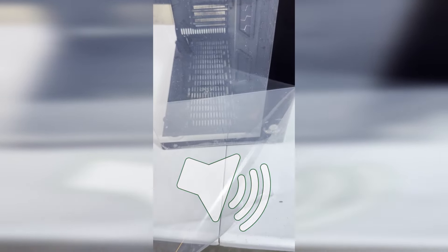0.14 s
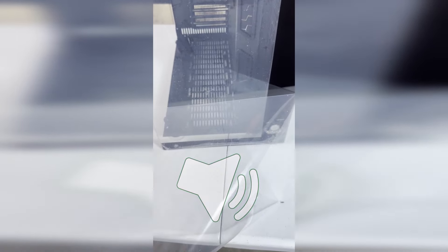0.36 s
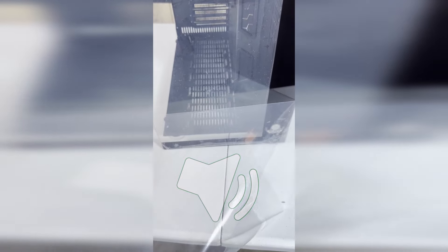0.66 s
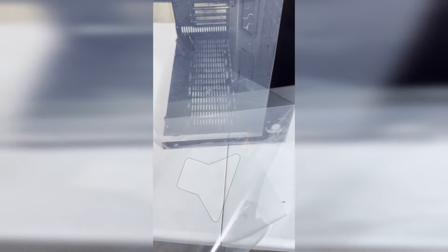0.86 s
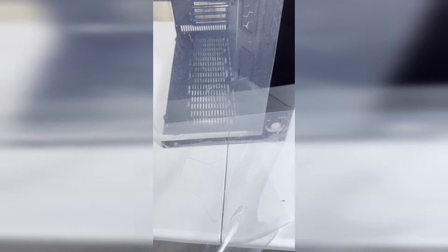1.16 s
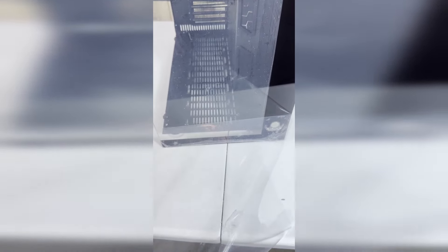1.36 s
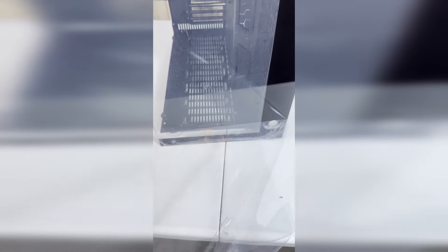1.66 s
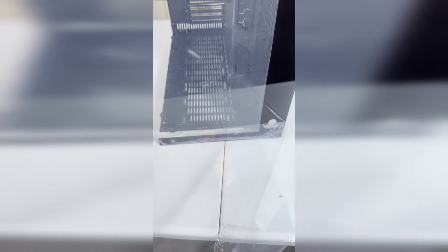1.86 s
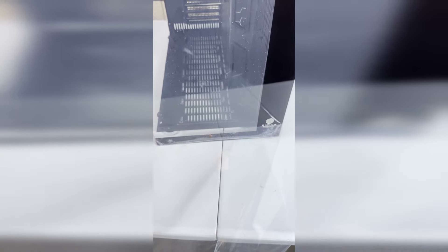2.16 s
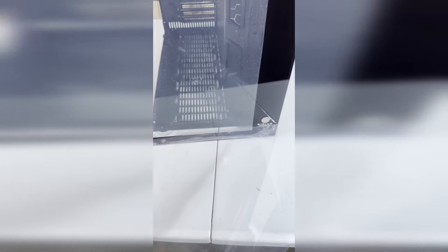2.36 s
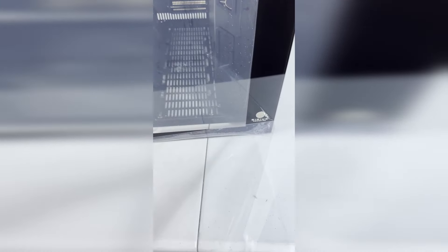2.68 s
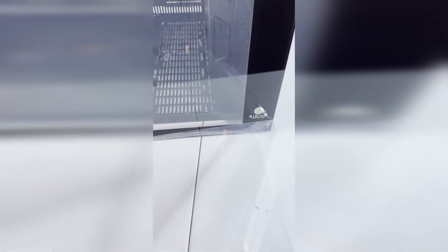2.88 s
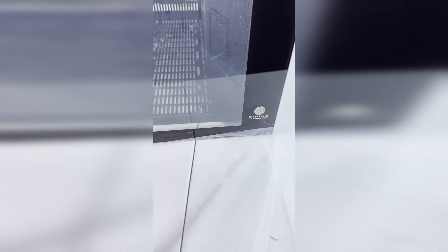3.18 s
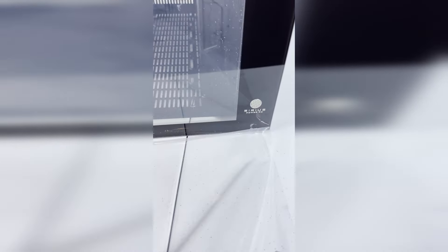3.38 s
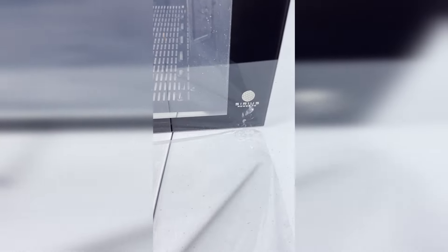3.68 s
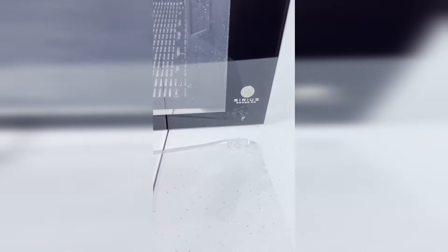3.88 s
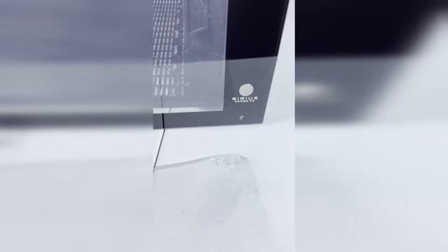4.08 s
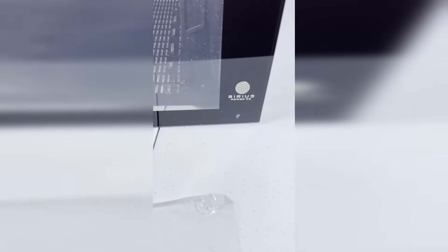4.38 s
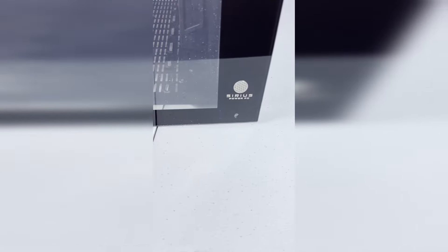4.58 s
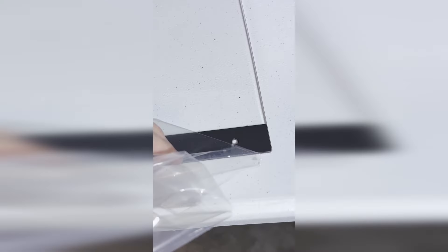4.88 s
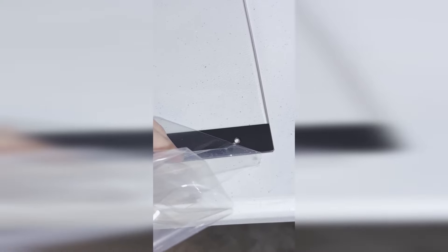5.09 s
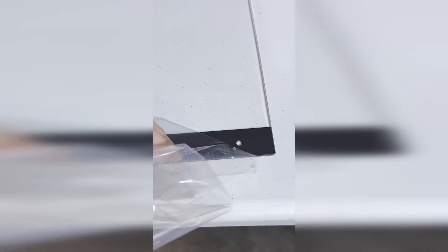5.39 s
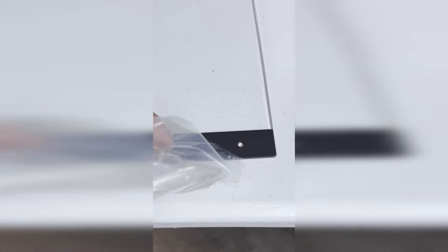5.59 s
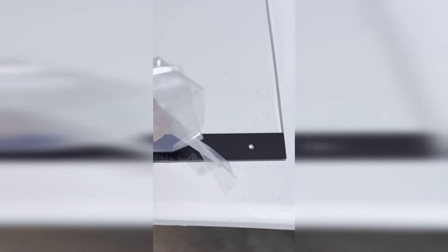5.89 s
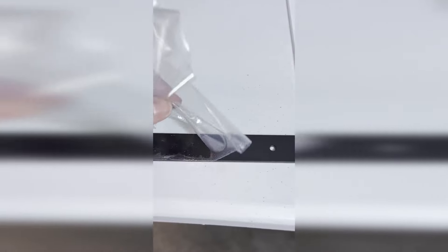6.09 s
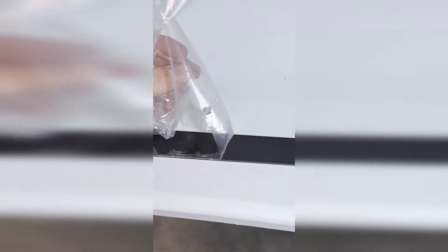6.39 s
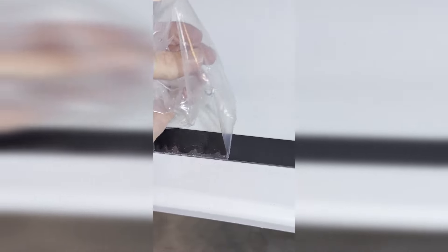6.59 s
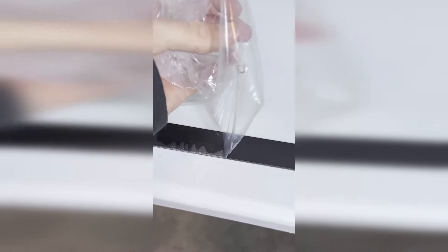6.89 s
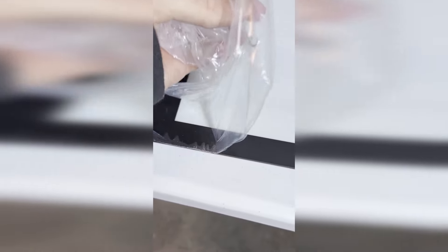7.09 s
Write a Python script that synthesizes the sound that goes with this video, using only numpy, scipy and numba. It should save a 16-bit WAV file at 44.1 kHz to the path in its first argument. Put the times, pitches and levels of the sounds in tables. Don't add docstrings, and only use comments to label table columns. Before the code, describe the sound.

Protective plastic film peels off a clear panel close up, hissing smoothly, then crackling sharply in jerks, ending in loud crinkling over low traffic rumble.

```python
import sys
import numpy as np
from scipy import signal
from scipy.fft import rfft, irfft, next_fast_len
from scipy.io import wavfile
from scipy.ndimage import uniform_filter1d, map_coordinates
from numba import njit

SR = 44100
rng = np.random.default_rng(int(sys.argv[2]) if len(sys.argv) > 2 else 0)


def wav_record(signal):
    frames = np.transpose(np.atleast_2d(signal))
    bounded = np.clip(frames, -1, 1)
    quanta = np.round(bounded * 32767).astype(np.int16)
    wavfile.write(sys.argv[1], SR, quanta)


def how_loud(loudness_db):
    steps = np.asarray(loudness_db, float) / 20
    return 10 ** steps


N = 319725
TIME = np.arange(N) / SR
SIZE = next_fast_len(N, True)
FREQ = np.fft.rfftfreq(SIZE, 1 / SR)


def weigh(x, gain):
    return irfft(rfft(x, SIZE) * gain, SIZE)[..., :N]


def colour(x, table):
    hz, db = np.transpose(table)
    return weigh(x, how_loud(np.interp(np.log(FREQ + 1), np.log(hz), db)))


def unit(x):
    return x / np.sqrt(np.mean(x ** 2))


def walk(rate_hz):
    hold = int(SR / rate_hz)
    steps = np.repeat(rng.standard_normal(N // hold + 1), hold)
    return 1.04 * uniform_filter1d(steps, hold)[:N]


# start t/s, end t/s
TAKES = [
    (0, 1.264),
    (1.266, 4.729),
    (4.728, 7.25),
]


def during(t0, t1):
    return np.clip(np.minimum(TIME - t0, t1 - TIME) / .003 + .5, 0, 1)


@njit
def resonate(x, hz, damping):
    y, band, low = np.empty(len(x)), 0., 0.
    for i in range(len(x)):
        g = np.tan(np.pi * hz[i] / SR)
        v = (band + g * (x[i] - low)) / (1 + g * (g + damping))
        band = 2 * v - band
        low = low + 2 * g * v
        y[i] = damping * v
    return y


GRIP_DB_S, LET_GO_DB_S = 1505.5, 1103


def effort(pulls):
    levels_db = []
    for t0, t1, db0, db1 in pulls:
        drift = np.interp(TIME, [t0, t1], [db0, db1])
        onset = GRIP_DB_S * np.clip(t0 - TIME, 0, None)
        release = LET_GO_DB_S * np.clip(TIME - t1, 0, None)
        levels_db.append(drift - onset - release)
    return np.max(levels_db, axis=0)


TEAR_S = 0.011


def tearing(start_s):
    s, db, ring_db, _ = np.concatenate(SNAP_FLURRIES).T
    kicks = np.zeros((2, N))
    kicks[:, (s * SR).astype(int)] = how_loud(np.array([db, db + ring_db])) ** 2 * (s > start_s)
    return signal.lfilter([1], [1, -np.exp(-1 / (TEAR_S * SR))], kicks)


def slipping(rate_hz, spread_db, cluster_db, hiss_db, tint):
    chance = rng.random((2, N))
    slips = (chance[0] < rate_hz / SR) * how_loud(-spread_db * np.log(chance[1] + .02))
    smear = rng.standard_normal(132) * np.exp(-np.arange(132) / SR / 0.00014)
    grain = unit(signal.fftconvolve(slips, smear)[:N]) + how_loud(hiss_db) * rng.standard_normal(N)
    grain = grain * how_loud(cluster_db * (walk(140) + .6 * walk(45)))
    return colour(grain, tint[:-1])


def split(x):
    top = 1 / (1 + (5250 / (FREQ + 1)) ** 9)
    low = 1 / (1 + (FREQ / 1450) ** 6)
    return [unit(band) for band in weigh(x, np.array([top, 1 - top - low, low]))]


FAR_LAG_MS, FAR_SWAY_MS, FAR_SHARE = 0.804, 0.035, 0.3
# t/s, lag/ms, share 0-1
NEAR_GLASS = [(3.7, .14, 0), (3.88, .15, .4), (4.05, .23, .4), (4.15, .275, .4), (4.35, .3, .3),
              (4.6, .26, .4), (4.73, .25, .5)]


def mirrored(x):
    s, near_lag_ms, near_share = np.transpose(NEAR_GLASS)
    far = TIME < TAKES[0][1]
    far_lag_ms = FAR_LAG_MS + FAR_SWAY_MS * walk(3.2)
    lag_ms = np.where(far, far_lag_ms, np.interp(TIME, s, near_lag_ms))
    late = map_coordinates(x, [np.arange(N) - SR / 1000 * lag_ms], order=2)
    dull = weigh(late, 1 / (1 + (FREQ / 4300) ** 8))
    bright = np.interp(TIME, s, near_share, right=0) * (late - dull)
    return x + np.where(far, -FAR_SHARE * dull, bright)


# start t/s, end t/s, from f/Hz, to f/Hz, boost level/dB
AIR_POCKET = [(0.088, 0.615, 1650, 1880, -3), (0.244, 0.564, 3300, 3500, 0.5),
              (1.015, 1.039, 850, 1000, 11), (1.022, 1.048, 2580, 1890, 1), (1.073, 1.244, 3000, 3200, -14),
              (7.088, 7.123, 6300, 5500, 2.5), (6.7, 6.77, 2810, 2020, 11.5),
              (6.81, 6.915, 1760, 1380, 8.5), (6.836, 7.068, 950, 480, 3.5),
              (7.07, 7.192, 1720, 1530, -0.5), (7.11, 7.25, 230, 204, 14.5)]


def pocketed(x):
    out = x
    for t0, t1, hz0, hz1, db in AIR_POCKET:
        boost = how_loud(db) * np.clip(np.minimum(TIME - t0, t1 - TIME) / 0.02 + 1, 0, 1)
        glide_hz = np.exp(np.interp(TIME, [t0, t1], np.log([hz0, hz1])))
        out = out + boost * resonate(x, glide_hz, 0.19)
    return out


# start t/s, end t/s, start level/dB, end level/dB
EASY_PULLS = [(0, .27, -48.5, -42), (.27, .6, -43, -41), (.6, .8, -43.5, -44.5), (.8, 1.01, -43.5, -39),
              (1.017, 1.054, -37.5, -35), (1.05, 1.27, -37, -39.5)]
JERKY_PULLS = [(1.264, 1.99, -54, -51.5), (1.98, 2.297, -51, -63), (2.305, 2.622, -58, -69.5),
               (2.647, 3.13, -62, -46.5), (2.176, 2.211, -49, -42.5), (3.163, 3.443, -49, -66.5),
               (3.444, 3.743, -62, -42), (3.559, 3.623, -48.5, -40), (3.756, 4.45, -42.5, -46),
               (4.433, 4.631, -48, -41), (4.632, 4.688, -43, -47.5), (4.692, 4.746, -45.5, -33.5)]
EDGE_PULLS = [(4.729, 5.453, -95, -75.5), (5.465, 5.52, -59, -55), (5.519, 5.699, -48, -54.5),
              (5.721, 5.796, -46, -50), (5.806, 6.065, -52, -42), (6.079, 6.143, -37.5, -37.5),
              (6.158, 6.23, -44.5, -46), (6.231, 6.282, -37, -31.5), (6.283, 6.377, -31, -40.5),
              (6.39, 6.664, -51.5, -48.5), (6.695, 6.765, -34.5, -33.5), (6.812, 6.955, -31.5, -30.5),
              (6.962, 7.08, -31, -31.5), (7.064, 7.254, -30, -30)]
# t/s, taut level/dB, slack level/dB
FILM_STATE = [(0, -2.5, -0.5), (.6, -8.5, -4.5), (1.26, -8.5, -8.5), (2, -7, -5), (2.35, -2, -11.5),
              (2.6, -5.5, -11), (2.9, -1, -14), (3.5, 1, -6), (3.75, 0.5, -14.5), (3.9, 7, -10.5),
              (4.05, 4.5, -9), (4.42, 12, -6), (4.722, 17, -5), (4.8, -5.5, 6), (5.5, 6, -4.5),
              (6.2, 6, 0.5), (6.7, 8, 3), (7.25, 5, -6)]
TEAR_DB = [-28, -31, -30]
# f/Hz, density level/dB per Hz
PEEL_COLOUR = [
    [(180, -44), (300, -25), (501, -13.5), (723, -4), (1030, -6.5), (1280, 4.5), (1670, -5), (1880, -1),
     (2480, 0.5), (3140, -3), (4870, -11), (7680, -4), (10000, -5.5), (13000, -14.5), (22000, -120)],
    [(180, -21.5), (300, -12.5), (402, -10.5), (439, -11.5), (734, -14), (3580, -12.5), (4870, -23),
     (5320, -16.5), (6530, -13), (8300, -15), (10000, -14.5), (13000, -30), (22000, -120)],
    [(180, -14.5), (300, -8), (767, -3.5), (1990, -2.5), (2960, 1.5), (4870, -4.5), (5900, -7.5),
     (7570, -13), (8890, -6), (10000, -9), (13000, -10), (22000, -120)],
]
# rate/Hz, size spread/dB, clustering/dB, smooth hiss level/dB
SLIPS = [
    (3000, 3, 1, -2),
    (1800, 3.2, 1.3, -4),
    (2200, 3.2, 1.6, -4),
]


def peel():
    out = 0
    s, taut_db, slack_db = np.transpose(FILM_STATE)
    taut = how_loud(np.interp(TIME, s, taut_db))
    slack = how_loud(np.interp(TIME, s, slack_db))
    hands = (EASY_PULLS, JERKY_PULLS, EDGE_PULLS)
    for take, pulls, tear_db, tint, slips in zip(TAKES, hands, TEAR_DB, PEEL_COLOUR, SLIPS):
        sizzle, sheet, flap = split(slipping(*slips, tint))
        pull = how_loud(effort(pulls))
        crack, ring = tearing(take[0])
        bright = np.sqrt((pull * taut) ** 2 + how_loud(tear_db) ** 2 * crack)
        body = np.sqrt(pull ** 2 + how_loud(tear_db + 7.5) ** 2 * ring)
        layers = bright * sizzle + body * sheet + slack * np.sqrt(pull * body) * flap
        out = out + during(*take) * layers
    return pocketed(mirrored(out))


# t/s, level/dB
RUMBLE_LEVEL = [
    [(0.0, -41.5), (1.238, -36.5), (1.27, -35)],
    [(1.27, -84), (1.29, -57), (1.65, -51.5), (1.9, -49), (2.1, -58), (2.45, -62.5), (4.73, -48.5)],
    [(4.74, -56.5), (6.59, -55.5), (7.25, -37)],
]
# f/Hz, density level/dB per Hz
RUMBLE_COLOUR = [
    [(12, -43), (20, -17), (49, 5), (113, -5.5), (146, 1), (420, -23.5), (550, -48), (920, -120)],
    [(12, -44), (20, -10), (87, -10.5), (203, -11.5), (237, -10.5), (420, -46), (550, -51.5), (920, -120)],
    [(12, -45.5), (20, -8.5), (70, -7.5), (188, -5.5), (228, -10.5), (420, -29), (550, -38.5), (920, -120)],
]


def rumble():
    out, noise = 0, rng.standard_normal(N) * how_loud(2.4 * walk(7.8))
    for take, table, tint in zip(TAKES, RUMBLE_LEVEL, RUMBLE_COLOUR):
        level = how_loud(np.interp(TIME, *np.transpose(table)))
        out = out + during(*take) * level * unit(colour(noise, tint))
    return out


SAG = 0.15


def crease(hz, edge_hz, ring_db):
    t = np.arange(2048) / SR
    noise = rng.standard_normal((2, 2048))
    decay = np.exp(-t / 0.00063) + how_loud(-16.5) * np.exp(-t / 0.0022) + how_loud(-33.5) * np.exp(-t / 0.045)
    shape = (1 - np.exp(-t / 0.00018)) * decay
    crack = signal.sosfilt(signal.butter(2, edge_hz, "high", fs=SR, output="sos"), noise[0] * shape)
    turns = 1.55 * (1 - np.exp(-SAG * hz * t)) / SAG
    ring = np.sin(2 * np.pi * turns) * (hz * t) ** 2 * np.exp(-hz * t / .8)
    scatter = noise[1] * np.roll(shape, shift=22)
    sheet_band = signal.butter(3, [0.5 * hz, 4000], "band", fs=SR, output="sos")
    ring, scatter = signal.sosfilt(sheet_band, [ring, scatter])
    body = ring / np.abs(ring).max() + how_loud(3.0) * scatter / np.abs(scatter).max()
    return how_loud(4.5) * crack / np.abs(crack).max() + how_loud(ring_db - 4.6) * body


CRACK_HZ = [5200, 5000, 6940]
# t/s, crack peak level/dB, ring over crack level/dB, ring f/Hz
FIRST_TUG = [(0.004, -22.5, -2, 1730), (0.0209, -29, 3, 1430), (0.2393, -20.5, -22, 2620),
             (1.6302, -9.5, -16.5, 1710), (1.635, -30, -3, 2860), (1.6381, -25.5, 0.5, 1750),
             (1.6757, -26.5, -5, 1450), (1.6845, -17.5, -3.5, 1920), (1.6916, -17, -6, 1740),
             (1.7036, -15.5, 4, 1430), (1.7179, -19.5, 4, 1830), (1.7204, -19.5, -7, 1740),
             (1.7287, -7, -7.5, 1330), (1.7369, -18.5, -4.5, 2000), (1.7392, -7, -3, 1510),
             (1.7565, -13, -6, 1434), (1.7685, -13, 3.5, 1467), (1.7835, -9.5, -6.5, 1700),
             (1.7872, -18, -5.5, 2040), (1.7908, -14, -5.5, 1875), (1.7982, -29.5, -6.5, 1770),
             (1.802, -18.5, 0.5, 1536), (1.8186, -7, 0.5, 1750), (1.8317, -4, 0, 1740),
             (1.8365, -17.5, 1, 1890), (1.8428, -22, -10.5, 2160), (1.8523, -16.5, -7.5, 1660),
             (1.8555, -18, -14.5, 2050)]
FURTHER_SNAPS = [
    (1.8218, -20.5, 0.5, 1810),
    (2.305, -34.5, -6, 2400),
]
TUG_TAIL = [(1.865, -31.5, 5, 1710), (1.8784, -21.5, -5, 1830), (1.885, -12, -2.5, 1900),
            (1.9007, -12.5, -5.5, 1980), (1.9114, -13.5, 4.5, 1640), (1.9182, -21, -2, 2270),
            (1.931, -22, -6, 1970), (1.9337, -27, -2, 1570), (1.9438, -22, -12, 2160),
            (1.9572, -18.5, -12, 2030), (1.9606, -26.5, -5, 2130), (1.9637, -21, -2, 1910),
            (1.9674, -21, -5, 1880), (1.9703, -30, 0, 2140), (1.9874, -22, -1.5, 1750),
            (1.9954, -25, -2.5, 1240), (2.0457, -32.5, -7, 1570), (2.0623, -11.5, -7, 1860),
            (2.084, -6, -5, 1870), (2.0942, -16, -1, 1350), (2.0985, -30.5, -6, 1710),
            (2.12, -21, 3.5, 1770), (2.1334, -17, -3, 1780), (2.1509, -25, -7, 2040),
            (2.2024, -30, 4, 1790), (2.2063, -34, 2, 1790), (2.2089, -33, -5, 2020), (2.2268, -40, 1, 2080),
            (2.2308, -32, -10, 2390), (2.243, -24.5, -6.5, 2000), (2.2466, -27, -5, 2070),
            (2.26, -40, -10, 2360), (2.301, -43, -12, 2560), (2.3075, -14.5, -12.5, 2220),
            (2.3161, -28, 3, 2670), (2.3202, -22, -4, 2170), (2.3361, -44, -14, 2410),
            (2.346, -32.5, -22, 2160), (2.3537, -22.5, -1.5, 2090), (2.3635, -17, -7, 2260),
            (2.3683, -24, -1, 1960), (2.3697, -28.5, 1, 2760), (2.384, -27, -27, 2180),
            (2.5773, -51, -11, 3210)]
SECOND_TUG = [(2.6348, -65, 4, 1850), (2.637, -46.5, 3, 2540), (2.6537, -53, 0, 2250),
              (2.662, -52, 1, 3120), (2.8427, -36, -0.5, 2970), (2.878, -37, -7, 2710),
              (2.888, -28.5, -6, 2670), (2.9338, -27, 4, 3200), (2.941, -18, -15, 2630),
              (2.946, -16.5, 0, 1930), (2.9938, -21, 0.5, 2160), (2.9972, -3, -10, 2120),
              (3.0115, -24, 3.5, 3060), (3.0251, -31.5, -1, 2790), (3.0585, -25, -1, 2800),
              (3.071, -24, -11, 2630), (3.0941, -17, -2.5, 3300), (3.138, -22.5, 4.5, 3420),
              (3.1414, -12.5, -17, 3230), (3.1534, -41, -12, 3070), (3.1743, -31, 1, 3200),
              (3.2026, -40, 7, 3310), (3.2254, -10.5, -2, 3400), (3.2346, -14.5, 5, 2210),
              (3.2843, -33, -12, 1550), (3.3215, -29, -0.5, 2160), (3.3433, -36.5, -7, 1490),
              (3.3583, -34, -14, 2290), (3.3798, -27, -6, 2330), (3.4533, -33, -8, 1250),
              (3.4874, -51, -16, 980)]
FOLDS = [(3.5382, -37, -15, 2100), (3.5454, -29.5, -8, 2440), (3.5933, -14, -4, 2580),
         (3.778, -23, -23, 3060), (3.9285, -19, -25, 3170), (4.021, -19, -12, 3502),
         (4.117, -22.5, -8, 1980), (4.1785, -24, -16, 3400), (4.227, -31, -20, 3040),
         (4.2375, -16, -26, 2820), (4.3308, -18, -25, 2200), (4.5386, -24.5, -22, 2080),
         (4.6385, -10.5, -21, 2710), (4.7163, -17, -29, 2760), (4.7223, -24.5, -23, 2360),
         (4.7265, -26, -18, 2060)]
REGRIP = [(4.848, -61, -12.5, 2700), (4.8564, -29, -10.5, 2440), (4.931, -48, -4, 3440),
          (4.9469, -41, -22, 3210), (4.9549, -49.5, -21, 2250), (4.9782, -55, -19, 800),
          (5.1077, -50, 9.5, 1425), (5.1347, -43.5, -6.5, 2270), (5.1524, -66.5, 21.5, 1229),
          (5.222, -61, 1.5, 2170), (5.2298, -53.5, 17, 2720), (5.2555, -55, 17, 2610),
          (5.3099, -60, -2.5, 1810), (5.321, -46, -4, 2210), (5.334, -46, 9, 2180),
          (5.3757, -42, -5.5, 2130), (5.4125, -60, 7, 1764), (5.4214, -38, -20, 2330),
          (5.4391, -60, 10, 1900), (5.4658, -27, -4.5, 880), (5.469, -46, -9, 1160),
          (5.484, -34, -0.5, 2980), (5.507, -37, 0, 1910), (5.5278, -28, 11, 2180),
          (5.5697, -29, -15, 2020), (5.5808, -24.5, -2, 2100), (5.611, -18.5, -4, 1670),
          (5.6307, -19, -10.5, 1290), (5.655, -26, -3, 1280), (5.6748, -28.5, -2, 1780),
          (5.6797, -36, 5, 1440), (5.6837, -39, 4, 1570), (5.713, -28, -5, 2090), (5.7437, -35, 7, 2420),
          (5.7497, -29, 4, 1420), (5.772, -28, -7, 2470), (5.7879, -24, 6.5, 1250), (5.7933, -36, 7, 1850),
          (5.8183, -38, 9.5, 2780), (5.875, -16, -5, 2240), (5.8786, -28.5, 4, 2160)]
CRUMPLE = [(5.9557, -35, 9, 1330), (6, -39, -11, 2880), (6.038, -29, 2, 1130), (6.0682, -25.5, 6.5, 2030),
           (6.0896, -24, 7.5, 2770), (6.1119, -15, -17, 1710), (6.178, -18.5, -6, 1850),
           (6.1996, -29, 0, 1410), (6.2164, -25, -3, 1320), (6.232, -29, -11, 1590), (6.3515, -26, 9, 2050),
           (6.3575, -26, 10, 2530), (6.3642, -29, -1, 1820), (6.3695, -24, -3.5, 1100),
           (6.3843, -19.5, -11, 2010), (6.4142, -53, 2, 1530), (6.4257, -37, 0, 2790),
           (6.45, -27, -8, 1250), (6.4544, -18, -5, 1320), (6.4868, -23, 0, 2140),
           (6.4924, -20, -1.5, 2270), (6.496, -24.5, -5.5, 1160), (6.5, -24, -17, 1760),
           (6.508, -20, -6, 1880), (6.515, -18.5, -12, 1760), (6.537, -23, -1, 1760),
           (6.5451, -14, -5.5, 2250), (6.5534, -23, -10, 1400), (6.5566, -19, 0, 2380),
           (6.5657, -17, -10, 2080), (6.5808, -38, -7, 1470), (6.593, -29, -9, 2050),
           (6.5991, -18, -0.5, 1370), (6.6058, -32, 1, 890), (6.634, -31, 4, 1100), (6.6732, -25, 0, 2130),
           (6.6795, -19, 3, 2250), (6.6865, -20.5, 5.5, 2190), (6.6912, -19, -8, 1720),
           (6.697, -23, -2, 2690), (6.7742, -17.5, 2, 1950), (6.7767, -24, 3, 1790),
           (6.805, -6.5, -4, 1600), (7.0101, -16.5, 0.5, 1280), (7.0987, -9.5, -1.5, 1720)]
SNAP_FLURRIES = (FIRST_TUG, FURTHER_SNAPS, TUG_TAIL, SECOND_TUG, FOLDS, REGRIP, CRUMPLE)


def snaps():
    out, t = np.zeros((2, N + 2048)), np.arange(2048) / SR
    for s, db, ring_db, hz in np.concatenate(SNAP_FLURRIES):
        edge_hz, end_s = next((edge, take[1]) for edge, take in zip(CRACK_HZ, TAKES) if s < take[1])
        pan_db = rng.normal(0, 1.2)
        sides = how_loud(db + np.array([[.5], [-.5]]) * pan_db)
        i = int(s * SR)
        out[:, i:i + 2048] += sides * crease(hz, edge_hz, ring_db) * (s + t < end_s)
    return out[:, :N]


# t/s, f/Hz, level/dB
DRONES = [
    [(1.28, 197.8, -58), (1.7, 225.5, -57), (2.1, 246, -59)],
    [(2.45, 224, -72), (2.7, 234.8, -64.5), (3.32, 261, -56.5)],
    [(2.5, 165, -73), (3.1, 186, -65)],
    [(1.95, 280.4, -61), (2.5, 310, -72), (3.15, 347, -57.5)],
    [(3.2, 165, -55), (3.55, 167, -62), (3.7, 175.3, -49), (3.85, 182, -50)],
    [(3.8, 385, -62), (4.4, 408.5, -54), (4.7, 410, -48.5)],
    [(4.74, 68.5, -51.5), (6, 68.3, -51), (7.25, 69.1, -58)],
    [(4.74, 186, -52.5), (5.4, 185.4, -60.5), (6, 189, -67)],
]


def drones():
    out = 0
    for line in DRONES:
        s, hz, db = np.transpose(line)
        phase = 2 * np.pi * np.cumsum(np.interp(TIME, s, hz) * (1 + .003 * walk(13))) / SR
        level = how_loud(np.interp(TIME, s, db) + 1.5 * walk(8))
        out = out + during(s[0], s[-1]) * level * np.sin(phase)
    return out


# f/Hz, level/dB
WHINE = [
    (2335, -82),
    (6100, -86.5),
]


def whine():
    out = 0
    for hz, db in WHINE:
        band = unit(resonate(rng.standard_normal(N), np.full(N, 1. * hz), 0.058))
        out = out + how_loud(db + 3.0 * walk(40)) * band
    return during(*TAKES[2]) * out


LEAN_DB = [-1.6, -.8, 0]


def scene():
    lean_db = sum(during(*take) * db for take, db in zip(TAKES, LEAN_DB))
    sides = how_loud(np.array([lean_db, -lean_db]) / 2)
    return (peel() + snaps()) * sides + rumble() + drones() + whine()


def scattered(x):
    out, angle = 0, 3.5 * walk(30)
    for share in (np.cos(angle), np.sin(angle)):
        path = rng.standard_normal(441) * np.exp(-np.arange(441) / SR / 0.0019)
        out = out + share * signal.fftconvolve(x, path / np.linalg.norm(path))[:N]
    return out


def low_pass(x):
    return signal.sosfilt(signal.butter(12, 17140, fs=SR, output="sos"), x)


# f/Hz, phase/rad
PORT_PHASE = [(5200, 0), (5300, .5), (6400, -.1), (10300, -2.2), (11100, -2.95), (12700, -3.14),
              (14200, -3.3), (15300, -4.4)]
# f/Hz, level/dB
STRAY_COLOUR = [(30, -21), (150, -13), (400, -11), (800, -9), (1700, -14.5), (2700, -4), (4200, -5),
                (4900, 12), (5600, -5.5), (6500, -17), (9000, -12.5), (10500, -18), (12500, -24),
                (15000, -15)]
STRAY_DB = [3.5, 3, -5]
# f/Hz, level/dB
MIC = [(25, -14), (60, -2.5), (4200, -1.5), (4900, -5.5), (5500, 1.5), (9500, 3), (11500, -0.5),
       (15300, -5), (15900, -2), (16200, -40.5), (17000, -46.5), (17400, -87.5)]


def record(dry):
    turn = np.exp(.5j * np.interp(FREQ, *np.transpose(PORT_PHASE)))
    stray = colour(scattered(dry.mean(0)), STRAY_COLOUR)
    stray = stray * sum(during(*take) * how_loud(db) for take, db in zip(TAKES, STRAY_DB))
    pair = weigh(dry, np.array([turn, 1 / turn])) + stray * np.array([[1], [-1]])
    pair = np.tanh(pair / .95) * .95
    return low_pass(colour(pair, MIC))


dry = scene()
out = record(dry)
wav_record(out)
```